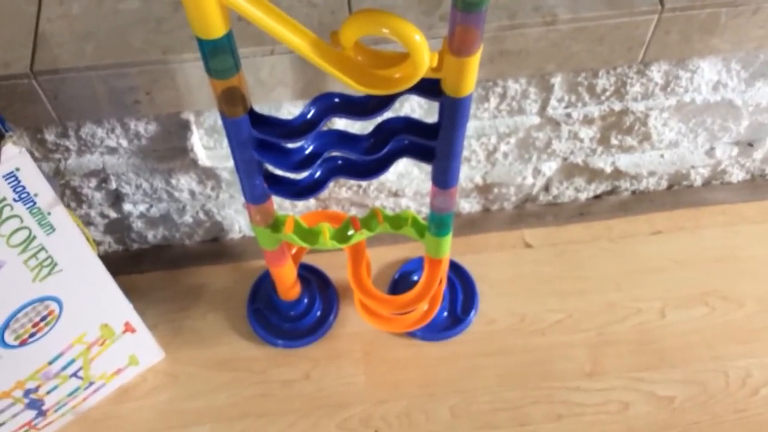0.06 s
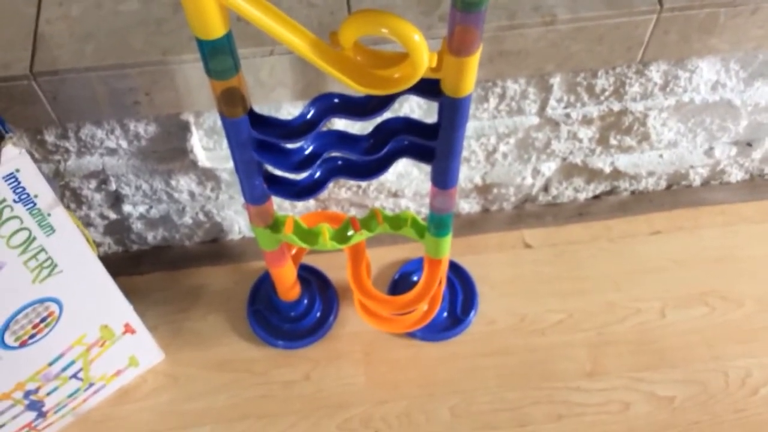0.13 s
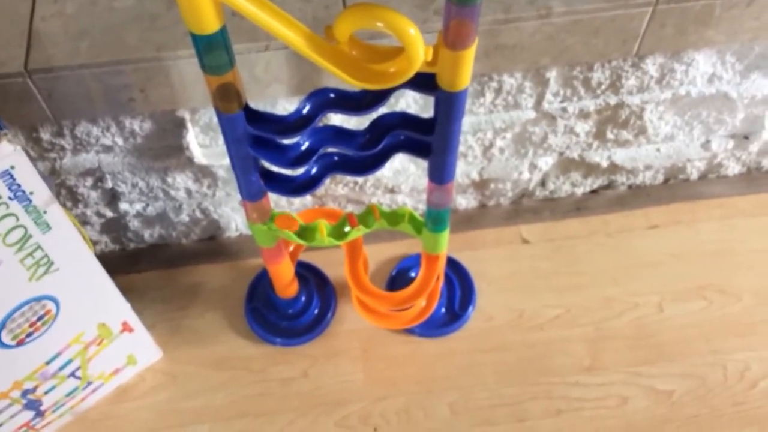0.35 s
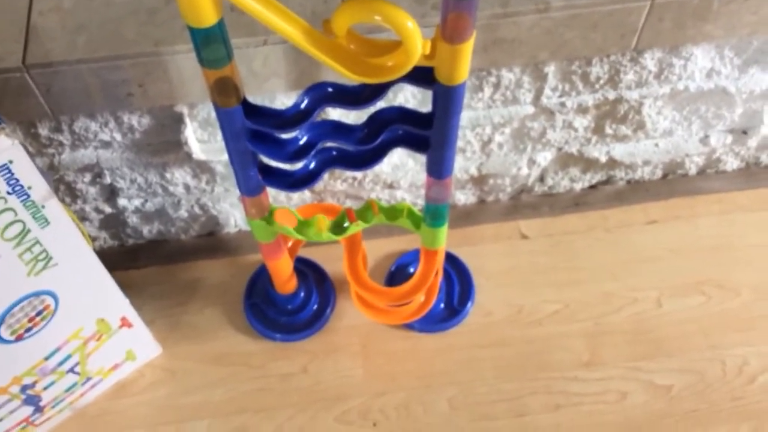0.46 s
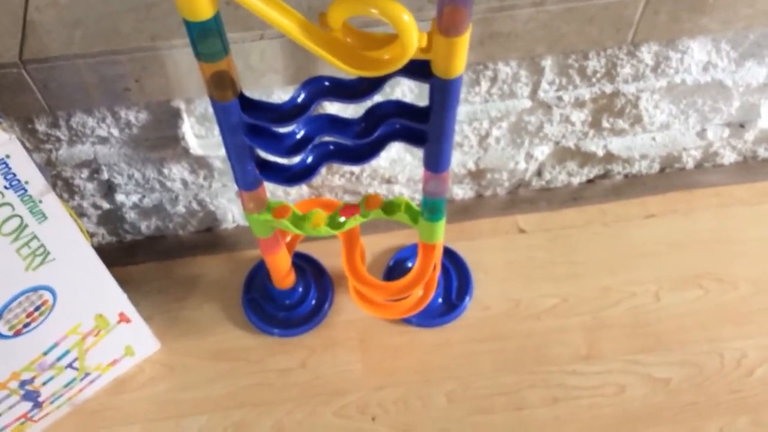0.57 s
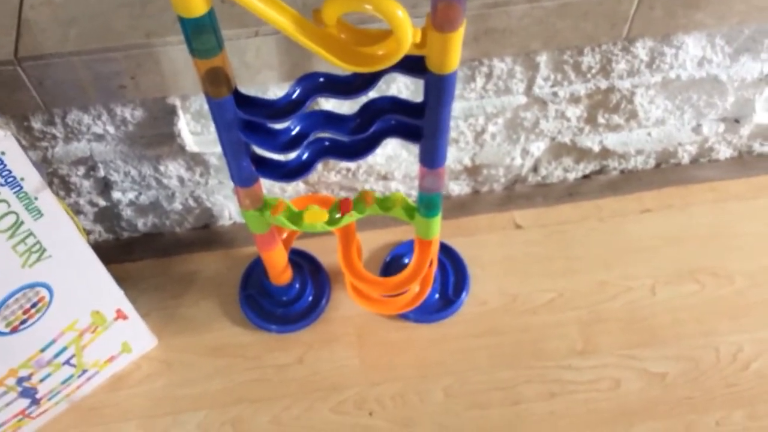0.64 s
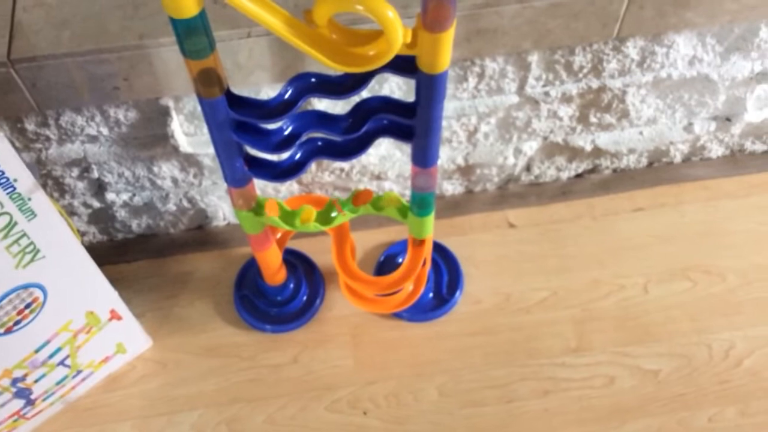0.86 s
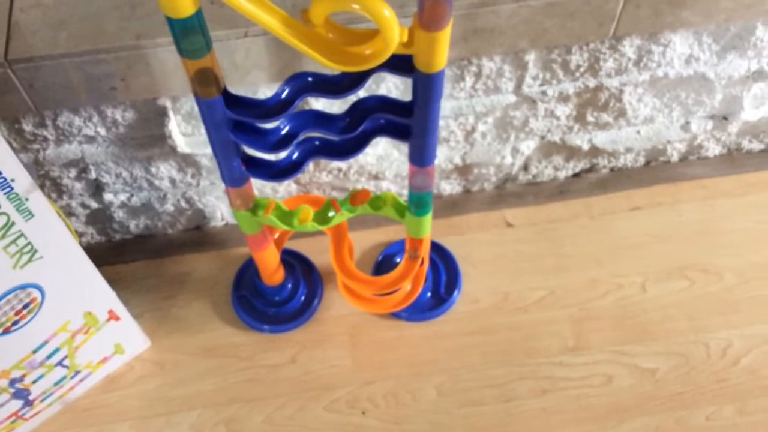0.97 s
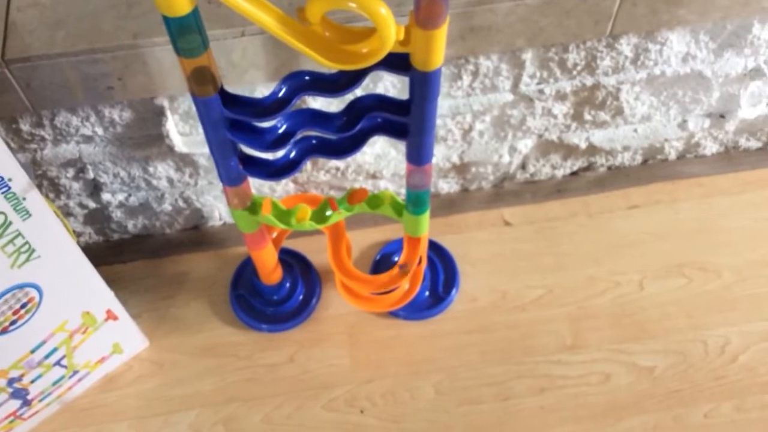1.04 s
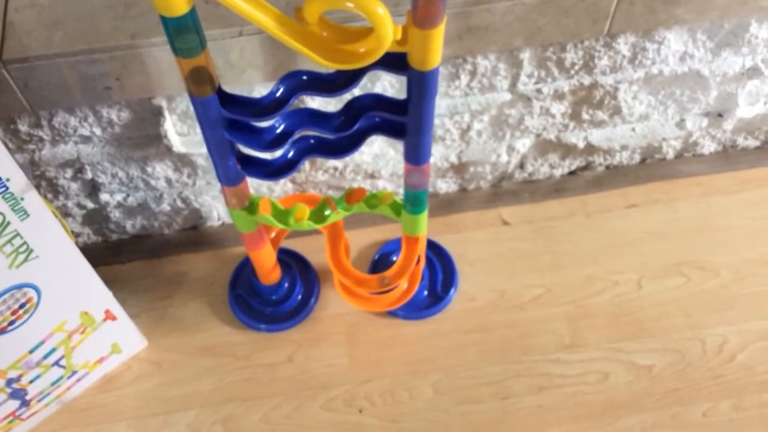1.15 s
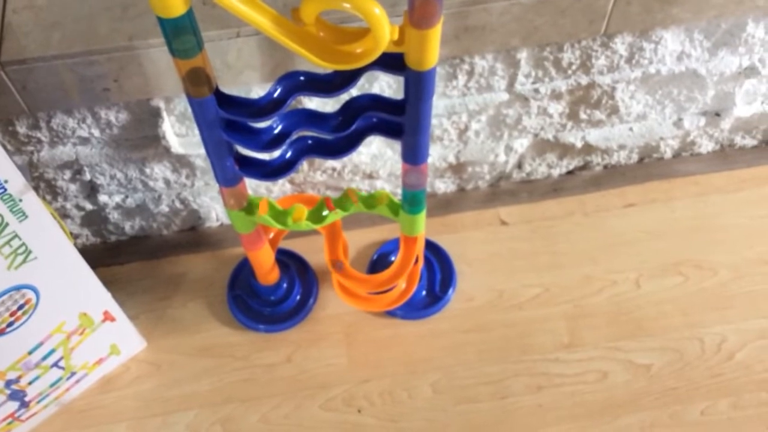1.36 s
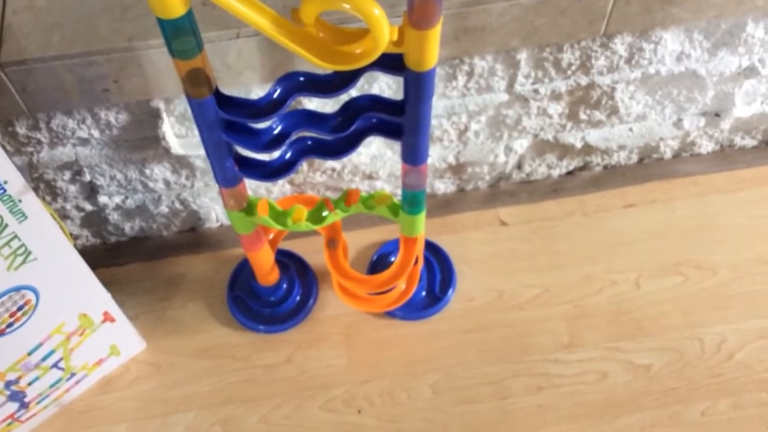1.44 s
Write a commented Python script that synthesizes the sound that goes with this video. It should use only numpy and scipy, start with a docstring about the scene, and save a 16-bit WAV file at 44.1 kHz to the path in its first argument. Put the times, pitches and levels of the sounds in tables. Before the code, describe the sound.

A marble clacks down a hollow plastic track on a table. An early hard knock thumps the stand, a rattling run of clicks follows, and soft ticks end it. The sound is close, in a quiet, slightly echoing room.

```python
"""Marble on a toy track

A marble clacks down a plastic toy track standing on a table in a small room.
Each contact rings the hollow plastic for a few milliseconds; between contacts tiny bumps
under the rolling marble make a fine rattle. The hardest knock also thumps the stand.
Soft noise and a faint hum lie under the room's short echo."""
import sys
import numpy as np
from scipy import signal
from scipy.fft import rfft, irfft
from scipy.io import wavfile

SR = 44100
rng = np.random.default_rng(int(sys.argv[2]) if len(sys.argv) > 2 else 0)


def wav_record(signal):
    """Record a signal, one row per channel, as 16-bit PCM in the file named by sys.argv[1]."""
    frames = np.transpose(np.atleast_2d(signal))
    bounded = np.clip(frames, -1, 1)
    # unit amplitude maps onto the largest positive 16-bit level
    quanta = np.round(bounded * 32767).astype(np.int16)
    wavfile.write(sys.argv[1], SR, quanta)


N = 66150
T = np.arange(N) / SR


def from_db(db):
    """Decibels to gain."""
    return 10 ** (np.asarray(db) / 20)


def unit_rms(x):
    """Scale to rms 1."""
    return x / np.sqrt(np.mean(x ** 2) + 1e-20)


def at_hz(table, hz, column=1):
    """Interpolate a table column over log frequency."""
    rows = np.array(table)
    return np.interp(np.log(np.maximum(hz, 1)), np.log(rows[:, 0]), rows[:, column])


def resonate(x, hz, width_hz):
    """Two-pole resonance, unity peak gain."""
    radius = np.exp(-np.pi * width_hz / SR)
    zeros = np.array([1, 0, -1]) * (1 - radius ** 2) / 2
    poles = [1, -2 * radius * np.cos(2 * np.pi * hz / SR), radius ** 2]
    return signal.lfilter(zeros, poles, x + 1e-18)


def ring_part(x, modes, skirt_ratio=1.313):
    """One part of the track: parallel modes, band-limited to their range."""
    ringing = sum(from_db(db) * resonate(x, hz, width_hz) for hz, width_hz, db in modes)
    edges_hz = [modes[0][0] / skirt_ratio, min(modes[-1][0] * skirt_ratio, SR / 2 - 1000)]
    return signal.sosfilt(signal.butter(2, edges_hz, "band", fs=SR, output="sos"), ringing)


# Room noise spectrum: (frequency [Hz], relative density [dB])
AIR_SPECTRUM = [(25, -20.5), (65, 0.5), (150, -2.5), (260, 0), (520, 0), (900, -9.5), (2000, -13),
                (4000, -27.5), (6500, -35.5), (15000, -31.5)]
# Hum tones: (frequency [Hz], rms level [dB])
HUM_TONES = [(220.7, -66), (258.4, -67), (479, -72)]


def background(air_db=-62):
    """Soft room noise and a faint hum."""
    air_gain = from_db(at_hz(AIR_SPECTRUM, np.fft.rfftfreq(N, 1 / SR)))
    air = irfft(rfft(rng.standard_normal(N)) * air_gain, N)
    hum = sum(from_db(db) * np.sqrt(2) * np.sin(2 * np.pi * (hz * T + rng.random()))
              for hz, db in HUM_TONES)
    return from_db(air_db) * unit_rms(air) + hum


# Track modes, shared with clacks(): (frequency [Hz], width [Hz], gain [dB])
BODY_MODES = [(324.4, 70, -11), (388, 70, 1), (515, 124, -2.5), (585, 45, -16.5)]
WALL_MODES = [(910, 120, -18.5), (1400, 270, -6.5), (1820, 250, -7), (2330, 320, 5), (2660, 520, -6.5)]
LIP_MODES = [(3777, 360, 2.5), (4095, 140, -0.5)]
RIM_MODES = [(4400, 220, 0), (4723, 320, 23), (5700, 500, -19.5)]
TICK_MODES = [(7300, 210, -13), (8740, 460, 2.5), (9350, 890, 2.5), (10500, 1400, -2), (12900, 1500, -9),
              (14500, 1400, -19.5)]
# Channel modes under the moving marble: (frequency [Hz], width [Hz], gain [dB])
ROLL_CHANNEL_MODES = [(2950, 680, 3.5), (3415, 270, 2.5)]
# Rattle mix: (body [dB], wall [dB], channel [dB], lip [dB], rim [dB])
RATTLE_MIX_DB = [-12.5, -8, 3, -14, -13]
# Rolling envelope: (time [s], level [dB], relative hiss level [dB])
ROLL_ENVELOPE = [(0, -68.5, -26), (0.129, -76, -13), (.17, -55, -26), (.21, -49, -23.5), (.24, -42, -18),
                 (.3, -41, -20), (.38, -54, -26), (0.472, -71, -9), (0.501, -46, -16), (0.552, -49, -18),
                 (0.591, -43.5, -42), (.68, -44, -16), (0.741, -38, -23), (0.831, -37.5, -21),
                 (.97, -48, -27), (1.04, -64, -18), (1.11, -60, -19), (1.2, -69.5, -14.5),
                 (1.419, -69.5, -40), (1.49, -66, -17)]


def rolling(bumps_per_s=1500, bump_spread_db=2.8, rattle_top_hz=5200):
    """Tiny bumps under the marble ring the track; fine friction adds a treble hiss."""
    sizes = from_db(bump_spread_db * np.minimum(rng.exponential(1, N), 4))
    signs = rng.choice([-1, 1], N)
    bumps = sizes * signs * (rng.random(N) < bumps_per_s / SR)
    parts = (BODY_MODES, WALL_MODES, ROLL_CHANNEL_MODES, LIP_MODES, RIM_MODES)
    rattle = sum(from_db(db) * unit_rms(ring_part(bumps, modes))
                 for modes, db in zip(parts, RATTLE_MIX_DB))
    rattle = signal.sosfilt(signal.butter(4, rattle_top_hz, fs=SR, output="sos"), rattle)
    times_s, level_db, hiss_db = np.transpose(ROLL_ENVELOPE)
    friction = unit_rms(ring_part(rng.standard_normal(N), TICK_MODES))
    hiss = from_db(np.interp(T, times_s, hiss_db)) * friction
    return (rattle + hiss) * from_db(np.interp(T, times_s, level_db))


def flurry(rise_s, fall_s, flatness=0.8):
    """Burst of tiny reflections that swells and dies within milliseconds."""
    t = T[:2048]
    envelope = (1 - np.exp(-(t / rise_s) ** 2)) * np.exp(-t / fall_s)
    spectrum = rfft(rng.standard_normal(len(t)) * envelope)
    flattened = irfft(spectrum / (np.abs(spectrum) + 1e-9) ** flatness)
    return flattened * np.exp(-t / (10 * fall_s))


# Marble contacts: (time [s], strength [dB], channel note [Hz],
# shares of body [dB], wall [dB], channel [dB], lip [dB], rim [dB], tick [dB])
CONTACTS = [(.1497,-21,3050,-24,-11,-18,-15,-18,-26), (.2222,-2,3140,-18,-16,-7,-20,-22,-25),
            (.2394,-11,3160,-21,-17,-7,-14,-22,-32), (.2547,-21,3400,-21,-22,-8,-7,-20,-18),
            (.2778,-14,3200,-26,-21,-6.5,-20,-29,-38), (.3905,-30,3140,-32,-24,-9.5,-18,-26,-19),
            (.4911,-27,3150,-29.5,-28,-9,-12,-17,-13.5), (.5665,-23,3140,-27,-24,-12.5,-19,-26,-13),
            (.6188,-18,3400,-30,-21,-12,-20,-22,-14.5), (.6385,-20,3260,-26,-23,-8.5,-16,-19,-27),
            (.676,-18,3020,-33,-27,-13,-21,-22,-15), (.7473,-4,3350,-45,-27,-5,-30,-16,-30),
            (.7641,-20,3550,-24,-18,-10,-13,-20,-27), (.7885,-15,3300,-31,-20,-13,-16,-22,-28),
            (.798,-7,3000,-20,-15,-14,-16,-11,-35), (.8118,-22,3400,-27,-14,-11,-11,-20,-19),
            (.8293,-18,3200,-27,-17,-13,-16,-18,-25), (.864,-13.5,3050,-22,-12.5,-12,-14,-14,-39),
            (.9128,-17,3050,-21,-12,-14,-17,-17,-42), (.9436,-23,3050,-18,-9.5,-9,-14,-20,-40),
            (.9637,-30,3050,-21,-10,-8,-14,-22,-48), (.976,-29,3050,-21,-15,-12,-18,-26,-45),
            (1.079,-41,3280,-29,-25,-7,-19,-24,-36), (1.2184,-47,3200,-14,-11,-8,-14,-30,-40),
            (1.236,-42,3200,-21,-14,-9,-14,-35,-52), (1.2872,-45,3100,-16,-13,-8,-14,-26,-46),
            (1.358,-50,3200,-14,-14,-11,-13,-26,-45), (1.479,-42,2950,-20,-8,-8,-23,-40,-55)]
# Struck channel modes, before tuning to the note: (frequency [Hz], width [Hz], gain [dB])
CHANNEL_MODES = [(3014, 150, 6.5), (3086, 127, 16), (3490, 120, -7.5)]
# Scatter in each part, body to tick: (rise [s], fall [s], gain [dB])
PART_SCATTER = [(0.00061, 0.0014, -5), (0.00061, 0.0049, -4), (0.0013, 0.0011, -4.5), (.0007, 0.006, -2.5),
                (0.00019, 0.0011, -5.5), (.0002, 0.0027, -7)]


def clacks(rms_window_s=0.0082):
    """Each contact scatters through the track and rings every part; the spot struck sets the note."""
    out = np.zeros(N + SR)
    for time_s, strength_db, note_hz, *shares_db in CONTACTS:
        start = int(time_s * SR)
        tuning = note_hz / CHANNEL_MODES[1][0]
        channel = [(hz * tuning, width_hz, db) for hz, width_hz, db in CHANNEL_MODES]
        parts = (BODY_MODES, WALL_MODES, channel, LIP_MODES, RIM_MODES, TICK_MODES)
        for modes, share_db, (rise_s, fall_s, part_db) in zip(parts, shares_db, PART_SCATTER):
            ring = ring_part(flurry(rise_s, fall_s), modes)
            ring *= np.sqrt(rms_window_s * SR / np.sum(ring ** 2))
            out[start:start + len(ring)] += from_db(strength_db + share_db + part_db) * ring
    return out[:N]


# Tube modes: (frequency [Hz], T60 [s], gain [dB])
TUBE_MODES = [(532, .1, -12), (2230, .1, -14.5), (3000, .1, -10), (3178, 0.18, -12), (3810, .12, -12)]


def tubes(x):
    """The track's tubes hold a few narrow notes after each blow."""
    return sum(from_db(db) * resonate(x, hz, np.log(1000) / (np.pi * t60_s))
               for hz, t60_s, db in TUBE_MODES)


# Room echo: (frequency [Hz], T60 [s], gain [dB])
ROOM_DECAY = [(152, 0.21, -24), (305, 0.1, -9.5), (550, 0.36, -9.5), (980, 0.37, -9), (1620, 0.34, -2),
              (3200, 0.35, -10), (5000, .42, -8.5), (9000, 0.21, -5), (15000, .25, -14)]


def echo_patterns(count=8, length=24000, delay_s=0.002, build_s=0.0028):
    """Diffuse echoes, one per marble position; each builds quickly and dies band by band."""
    hz = np.fft.rfftfreq(length, 1 / SR)
    t = np.maximum(T[:length] - delay_s, 0)
    white = rfft(rng.standard_normal((count, length)))
    edges_hz = np.geomspace(60, 20000, 18)
    echoes = np.zeros((count, length))
    for low_hz, high_hz in zip(edges_hz, edges_hz[1:]):
        centre_hz = np.sqrt(low_hz * high_hz)
        envelope = (1 - np.exp(-t / build_s)) * from_db(-60 * t / at_hz(ROOM_DECAY, centre_hz))
        band = irfft(white * (hz >= low_hz) * (hz < high_hz), length) * envelope
        energy = np.sum(band ** 2, axis=1, keepdims=True)
        band *= np.sqrt(2 * (high_hz - low_hz) / SR / energy)  # unity gain in band
        echoes += from_db(at_hz(ROOM_DECAY, centre_hz, column=2)) * band
    return echoes


def room_echo(x, crossfade_s=0.05):
    """As the marble travels, its sound crossfades from one echo pattern to the next."""
    echoes = echo_patterns()
    out = np.zeros(N)
    for k, echo in enumerate(echoes):
        position = (T / crossfade_s - k) % len(echoes)
        fade = np.sin(np.pi / 2 * position) * (position < 2)
        out += signal.fftconvolve(x * fade, echo)[:N]
    return out


# Stand modes: (frequency [Hz], T60 [s], relative level [dB])
STAND_MODES = [(146, 0.039, -12.5), (306, 0.026, -14), (506, 0.034, -6.5), (910, 0.0051, -3)]


def stand_thump(time_s=0.234, gain_db=-13, low_cut_hz=92):
    """The stand knocks once on the table."""
    t = np.maximum(T - time_s, 0)
    knock = sum(from_db(gain_db + db - 60 * t / t60_s) * np.sin(2 * np.pi * hz * t)
                for hz, t60_s, db in STAND_MODES)
    return signal.sosfilt(signal.butter(3, low_cut_hz, "high", fs=SR, output="sos"), knock)


def scene():
    """Track, echo and quiet room, in mono."""
    track = clacks() + stand_thump() + rolling()
    track += tubes(track)
    return (track + room_echo(track) + background())[None]


def record(dry):
    """Soft peak limit, then low-pass."""
    peak_limit, cutoff_hz = 0.9, 17000
    rounded = dry / (1 + (dry / peak_limit) ** 6) ** (1 / 6)
    return signal.sosfilt(signal.cheby2(12, 70, cutoff_hz, fs=SR, output="sos"), rounded)


dry = scene()
out = record(dry)
wav_record(out)
```